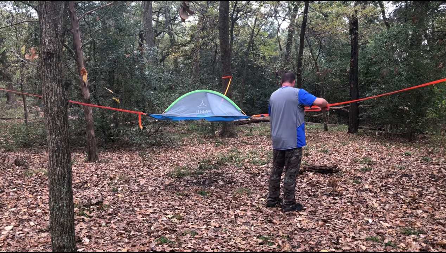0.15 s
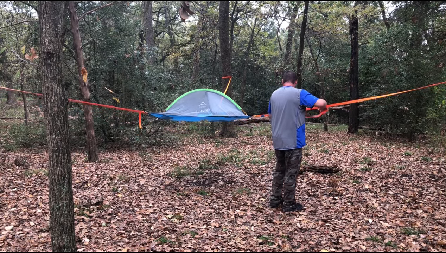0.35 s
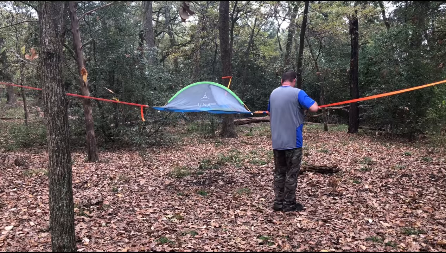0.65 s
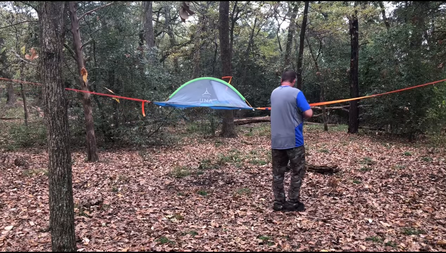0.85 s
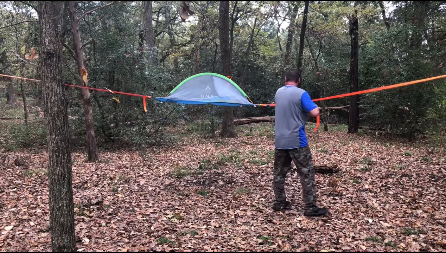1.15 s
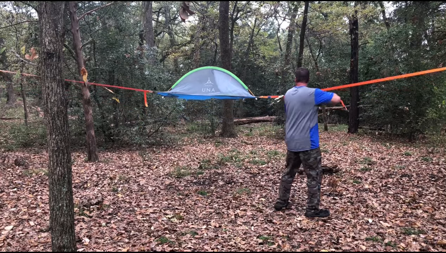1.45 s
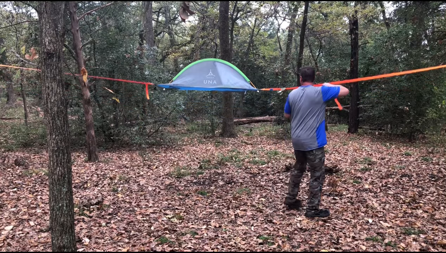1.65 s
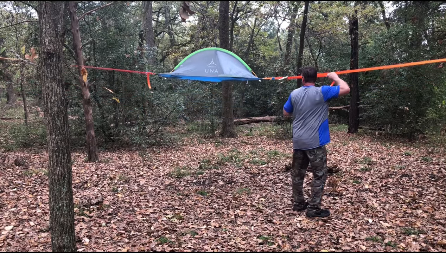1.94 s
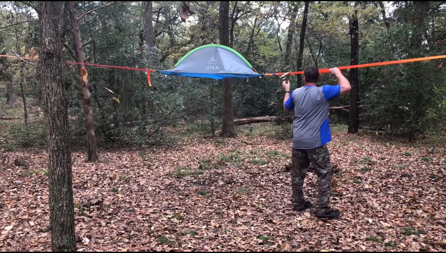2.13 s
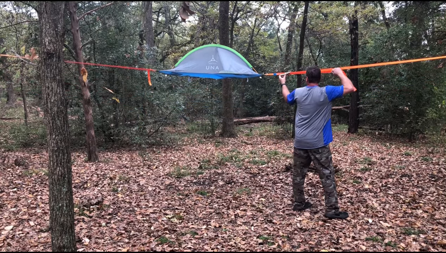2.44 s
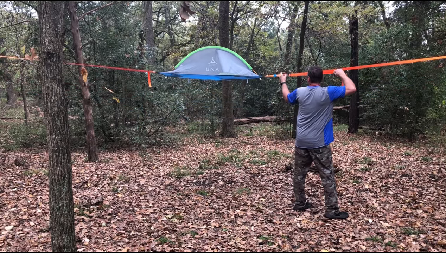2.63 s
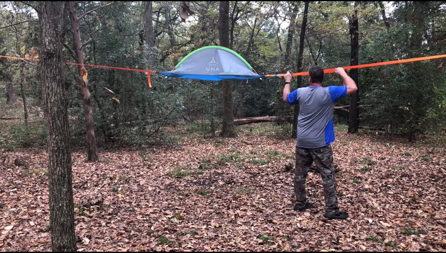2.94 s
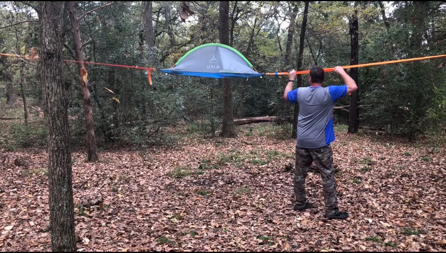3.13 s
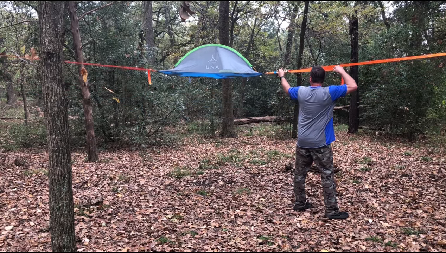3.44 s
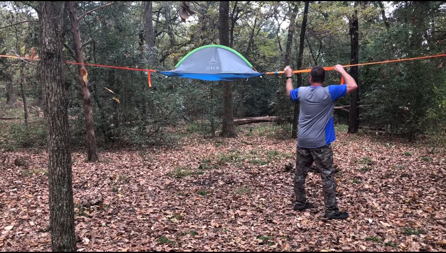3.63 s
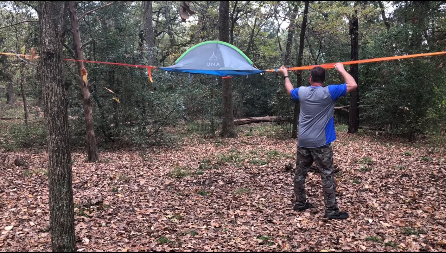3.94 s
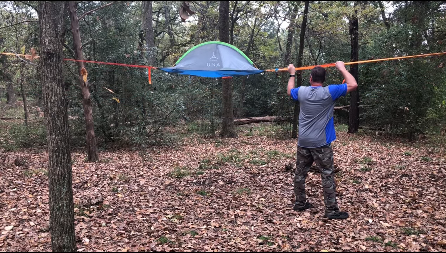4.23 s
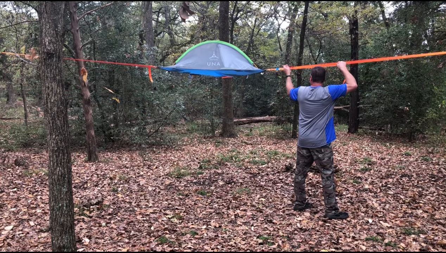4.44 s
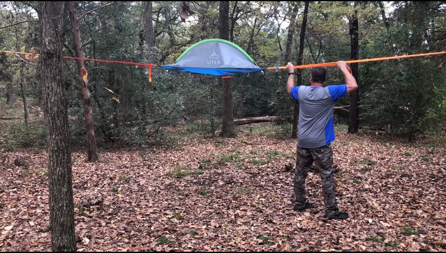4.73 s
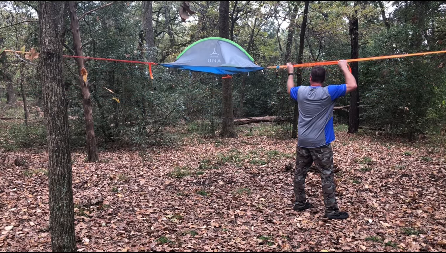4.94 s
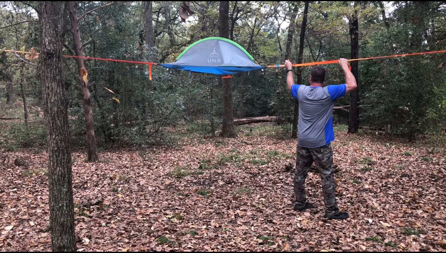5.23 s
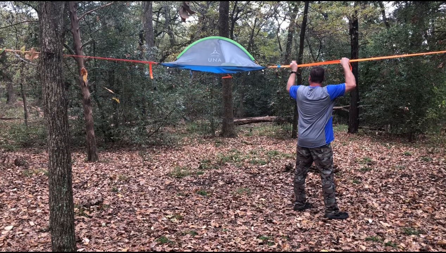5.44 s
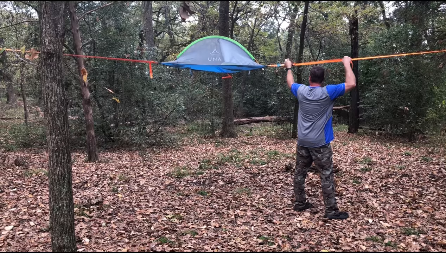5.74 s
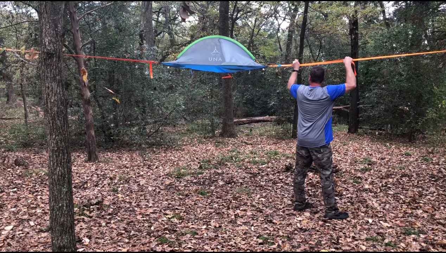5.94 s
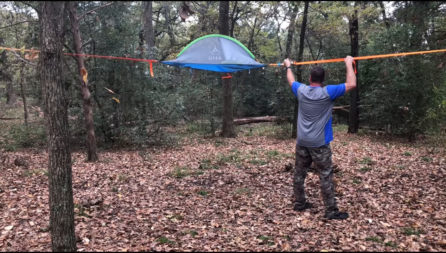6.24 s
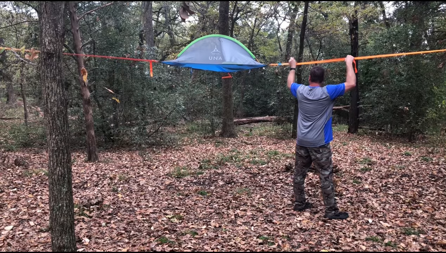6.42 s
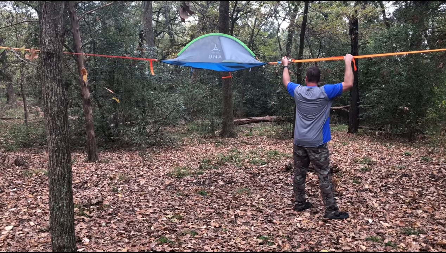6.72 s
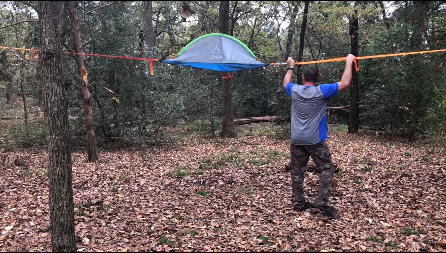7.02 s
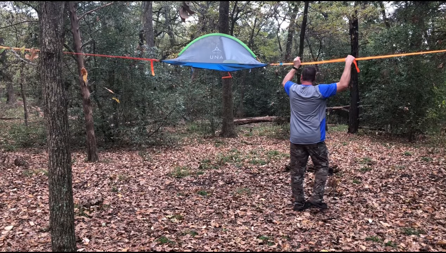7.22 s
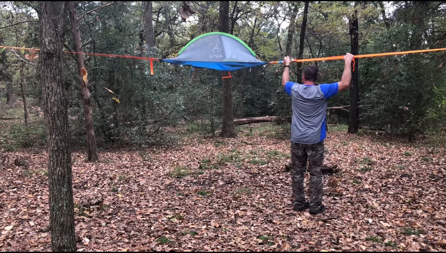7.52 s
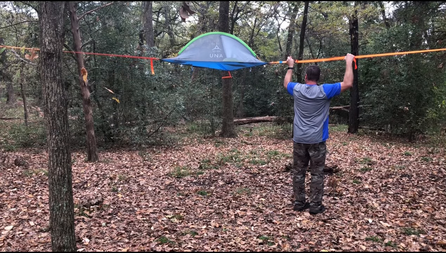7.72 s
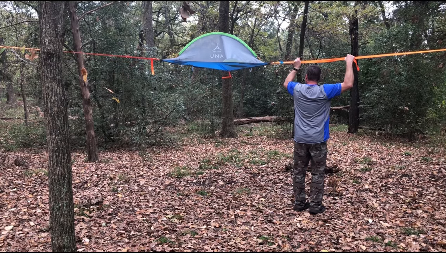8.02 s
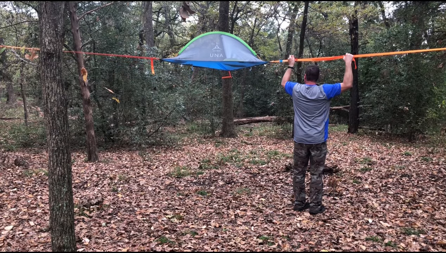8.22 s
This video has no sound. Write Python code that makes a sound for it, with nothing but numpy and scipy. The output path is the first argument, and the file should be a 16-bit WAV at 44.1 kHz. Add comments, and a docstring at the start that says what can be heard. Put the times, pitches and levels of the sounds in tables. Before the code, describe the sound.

A steel ratchet tightens a strap a few metres from the microphone, outdoors among trees. First the slack slides through with a faint rasp, and dry leaves crackle underfoot. After some light clicks from the handle, the cranking begins: bright, crisp double clicks as the handle swings back and forth, each with a short scattered echo from the woods. Soft air and a low, distant rumble lie underneath.

```python
"""A webbing strap is tensioned with a steel ratchet, a few metres away in quiet woods.
Over a distant rumble and a soft hiss of air, the slack is first drawn through with a hiss of friction
while boots crush dry leaves. From 2.4 s come light steel clicks and knocks from the handle and its pawl.
From 3 s it is cranked: on each return the handle pawl snaps over two teeth, on each stroke the loaded
locking pawl does and sets wheel and frame ringing. Brush and trunks scatter every click."""
import sys
import numpy as np
from scipy import signal
from scipy.fft import rfft, irfft
from scipy.io import wavfile
from scipy.ndimage import uniform_filter1d

SR = 44100
rng = np.random.default_rng(int(sys.argv[2]) if len(sys.argv) > 2 else 0)


def unload_audio(sound):
    """Save the sound as a 16-bit wav file, at the path given as the first command line argument."""
    columns = np.transpose(np.atleast_2d(sound))
    # keep every value between -1 and 1, then stretch to whole-number steps
    steps = np.round(np.clip(columns, -1, 1) * 32767)
    wavfile.write(sys.argv[1], SR, steps.astype(np.int16))


N = 369116
TIME = np.arange(N) / SR
AGE = np.arange(SR // 20) / SR   # time since a click, s

# Levels in the tables are relative. Spectral densities of the continuous noises: (f/Hz, level/dB)
RUMBLE_SPECTRUM = [(20, -42), (30, -24), (40, -10.5), (50, -4.5), (61, -9), (72, 3.5), (88, -2),
                   (110, -2.5), (150, -6.5), (200, -11.5), (300, -26)]
AIR_SPECTRUM = [(130, -19.5), (220, 0.5), (350, -0.5), (600, -3), (1000, -4.5), (1600, -9), (2500, -13),
                (4500, -15.5), (7000, -19.5), (10000, -24.5), (15500, -29.5), (16200, -53)]
HISS_SPECTRUM = [(3000, -12), (5000, -5), (7000, -4), (10000, -6), (15500, -4), (16200, -30)]
RASP_SPECTRUM = [(350, -14), (700, 0), (1200, -0.5), (2000, -5.5), (3600, -4), (5000, -7), (7000, -30)]
LEAF_SPECTRUM = [(900, -12), (2000, 0.5), (3500, 0.5), (6000, -4), (10000, -16), (15500, -12)]
# spectral densities of the light ticks, the handle pawl and the locking pawl: (f/Hz, level/dB)
TICK_SPECTRUM = [(1500, -20), (2800, -8), (4000, -3.5), (6000, 0), (9500, 2), (13000, -3), (15700, -5),
                 (16500, -5.5)]
HANDLE_SPECTRUM = [(700, -17), (1800, -10.5), (2700, -6), (3400, -2), (4200, -2), (5100, 0.5), (8000, -2),
                   (9600, 2.5), (10900, -1.5), (13000, 3), (14300, 4.5), (14800, 1), (15700, -3),
                   (16500, -33)]
LOCK_SPECTRUM = [(600, -22), (1150, -24.5), (1500, -10.5), (2050, -15.5), (2300, -9), (3000, -12.5),
                 (3750, -1.5), (4700, -6.5), (6000, 2), (6600, -1), (11000, 5.5), (14300, 5.5),
                 (15700, 4.5), (16500, -15)]
# webbing drawn through the spool: (t/s, duration/s, level/dB)
STRAP_DRAWS = [(0.344, .26, -58.5), (.915, 0.043, -61.5), (0.963, 0.11, -59.5), (1.063, 0.22, -57),
               (1.564, 0.085, -65), (1.677, 0.083, -63), (1.766, 0.1, -54.5), (1.975, 0.25, -64),
               (2.19, .3, -63)]
# a boot shifts in the leaves: (t/s, spread/s, level/dB)
BOOT_SHIFTS = [(.51, 0.056, -60.5), (1.2, 0.084, -60.5), (1.84, .02, -56), (2.41, 0.066, -61)]
# light steel clicks and knocks from the handle and its pawl: (t/s, level/dB, loss on bouncing/dB)
LIGHT_CLICKS = [(2.4084, -36, 19), (2.6373, -24.5, 28), (2.7432, -38, 5), (2.7955, -38, 15),
                (3.64, -28, -1), (3.9948, -26.5, 15), (4.7336, -25.5, 4), (5.273, -24, 2),
                (5.813, -28.5, 10), (6.118, -28, 11), (6.366, -23.5, 0.5), (6.708, -24, 14),
                (6.962, -26, 8), (7.661, -28.5, 5), (7.9529, -23.5, 17), (8.08, -25.5, 3), (8.285, -31, 10)]
# reflections from the leafy ground and near trunks: (delay/s, level/dB)
REFLECTIONS = [(0.0145, -18.5), (.023, -27.5), (.115, -42.5), (.157, -38)]
# handle pawl drops, two to a return: (t/s, chatter duration/s, level/dB, brightness/dB)
HANDLE_DROPS = [(3.0174, 0.0026, -32, 0.8), (3.1766, 0.0026, -30.5, 1), (3.7481, 0.0011, -32, 1),
                (3.8036, 0.001, -31, 0), (4.3144, 0.003, -31, 0.5), (4.369, 0.0029, -33, 2),
                (4.8363, .0023, -32, 2.7), (4.889, 0.0012, -31.5, 0), (5.397, 0.0028, -32.5, 1.3),
                (5.4526, 0.002, -33, 2.2), (5.948, 0.0015, -32.5, 2.5), (6.0048, 0.0039, -33.5, 0.2),
                (6.5134, 0.0031, -32.5, -.4), (6.5807, 0.0034, -34, -1), (7.207, 0.0042, -32.5, .1),
                (7.2721, 0.0042, -34, -3), (7.979, 0.0042, -33.5, -.3), (8.1066, 0.0032, -33.5, 0)]
# locking pawl drops, two to a stroke: (t/s, chatter duration/s, level/dB, brightness/dB, ring level/dB)
LOCK_DROPS = [(3.4378, .0036, -29, -1.8, -28.5), (3.509, 0.0024, -29.5, -0.5, -27.5),
              (4.0545, 0.0039, -25.5, 0.5, -30.5), (4.1383, 0.0046, -26, 0, -32),
              (4.5771, 0.0027, -28, 1.5, -30), (4.6382, 0.0033, -28, 1, -30.5),
              (5.112, 0.0022, -29.5, 1, -25), (5.1794, 0.0042, -28.5, -1, -34),
              (5.6562, 0.0018, -26.5, 3.5, -31), (5.709, 0.0027, -27, -2, -32.5),
              (6.1816, 0.0034, -28.5, 1.5, -30), (6.2271, 0.0035, -29, 1.5, -30),
              (6.773, 0.0043, -27, 0.5, -29.5), (6.8397, .004, -28, 0, -29),
              (7.4873, 0.0028, -27, -2.5, -31), (7.5571, 0.0031, -27, -2.4, -30.5)]
# four bands of a pawl's clash: (lower f/Hz, upper f/Hz)
CLASH_BANDS = [(0, 3000), (3000, 6500), (6500, 11000), (11000, 17000)]
# mean balance of each pawl's clash: (level/dB in each band)
HANDLE_BAND_DB = [-19, -4, -1, 0]
LOCK_BAND_DB = [-16.5, -7, -0.04, 0]
# damped modes of the ratchet wheel: (f/Hz, bandwidth/Hz)
WHEEL_MODES = [(7350, 170), (10100, 200), (11930, 380)]
# their excitation, one row for each tooth of a stroke: (level/dB of each mode)
TOOTH_MODE_DB = [(.5, 0, -0.5), (0.029, -8, 4.5)]
# modes of the steel frame: (f/Hz, level/dB, t60/s)
FRAME_MODES = [(7580, -2, .2), (10200, -13, .22), (10685, -7, .24), (11600, -3, .22), (12010, -11, .17),
               (13140, -10.5, .17)]


def from_db(db):
    """Amplitude ratio of a level in decibels."""
    return 10 ** (np.asarray(db) / 20)


def unit_energy(x):
    """Normalisation: the squares sum to one."""
    return x / np.sqrt(np.sum(x ** 2) + 1e-20)


def noise(spectrum, size, band=(0, SR)):
    """Spectral shaping: Gaussian noise of rms 1, confined to a band."""
    hz = np.maximum(np.fft.rfftfreq(size, 1 / SR), 1)
    point_hz, point_db = np.array(spectrum).T
    gain = from_db(np.interp(np.log(hz), np.log(point_hz), point_db, left=-np.inf, right=-np.inf))
    gain = gain * (hz >= band[0]) * (hz < band[1])
    return unit_energy(irfft(rfft(rng.standard_normal(size)) * gain, size)) * np.sqrt(size)


def flutter(time, step):
    """Random modulation: a new Gaussian value every `step` samples, linearly joined."""
    return np.interp(time, time[::step], rng.standard_normal(len(time[::step])))


def add(track, s, sound):
    """Superposition of a sound on a track, starting at s seconds."""
    start = int(round(s * SR))
    track[start:start + len(sound)] += sound[:len(track) - start]


def background(rumble_db, air_db):
    """Stationary noise: a distant rumble and the hiss of air in the trees."""
    return from_db(rumble_db) * noise(RUMBLE_SPECTRUM, N) + from_db(air_db) * noise(AIR_SPECTRUM, N)


def draw(start_s, length_s, attack_s=0.034, swell_db=5, release_s=.022):
    """Friction noise grows with sliding speed: the envelope of a pull that is fastest halfway through."""
    age = TIME - start_s
    attack = np.clip(age / attack_s, 0, 1)
    swell = from_db(swell_db * (np.sin(np.pi * np.clip(age / length_s, 0, 1)) - 1))
    return attack * swell * np.exp(-np.clip(age - length_s, 0, 1) / release_s)


def webbing(hiss_db, rasp_db, grain_db, firm_pull_db=-58, rasp_exponent=0.93):
    """Stick-slip friction: the weave catches and slips on the spool, giving a finely grained noise."""
    pull = np.max([from_db(db) * draw(s, length_s) for s, length_s, db in STRAP_DRAWS], axis=0)
    rasp_envelope = from_db(firm_pull_db) * (pull / from_db(firm_pull_db)) ** rasp_exponent
    grain = from_db(grain_db * flutter(TIME, step=70))
    hiss = pull * from_db(hiss_db) * noise(HISS_SPECTRUM, N)
    rasp = rasp_envelope * from_db(rasp_db) * noise(RASP_SPECTRUM, N)
    return grain * (hiss + rasp)


def leaves(crackle_db):
    """Brittle fracture: dry leaves crush under the boots in small, uneven cracks."""
    weight = sum(from_db(db) * np.exp(-.5 * ((TIME - s) / spread_s) ** 2)
                 for s, spread_s, db in BOOT_SHIFTS)
    cracks = from_db(crackle_db * np.minimum(flutter(TIME, step=40), 2.5))
    return weight * unit_energy(cracks * noise(LEAF_SPECTRUM, N)) * np.sqrt(N)


def touches(bounce_s=0.019, take_up_s=.0135, take_up_db=-27.5, grip_lead_s=(.015, .1), grip_db=-35.5):
    """Backlash: light clicks, their bounces, the take-up before a return and the grip before a stroke."""
    clicks = [(s, db) for s, db, _ in LIGHT_CLICKS]
    bounces = [(s + bounce_s, db - loss_db) for s, db, loss_db in LIGHT_CLICKS]
    take_ups = [(s - take_up_s, take_up_db) for s, *_ in HANDLE_DROPS[::2]]
    grips = [(s - rng.uniform(*grip_lead_s), grip_db) for s, *_ in LOCK_DROPS[::2] for _ in range(3)]
    return clicks + bounces + take_ups + grips


def chatter(length_s, t60, bounce_db, rise_s=0.00027):
    """Contact bounce: the envelope of an impact holds unevenly for a moment, then decays exponentially."""
    decay_db = -60 * np.maximum(AGE - length_s, 0) / t60
    return np.minimum(AGE / rise_s, 1) * from_db(bounce_db * flutter(AGE, step=24) + decay_db)


def light_ticks(level_db, t60, rebound_db, rebound_s, rebounds=3):
    """Inelastic impact: each light touch of the handle or its pawl is followed by weaker rebounds."""
    out = np.zeros(N)
    for s, db in touches():
        envelope = chatter(0.00066, t60, bounce_db=5.5)
        for delay in rng.uniform(0.0022, rebound_s, rebounds):
            add(envelope, delay, from_db(rebound_db) * chatter(0.00032, t60 / 2, bounce_db=2.0))
        add(out, s, from_db(db + level_db) * woods(envelope * noise(TICK_SPECTRUM, len(AGE))))
    return out


def woods(click, near_db=-17, near_t60=0.15, far_db=-13, far_t60=0.79, treble_t60=0.35,
          echo_t60=0.012, blur_hz=230):
    """Scattering and reflection: echoes and a diffuse tail from brush and trunks follow the click."""
    size = SR // 2
    age = np.arange(size) / SR
    # the steel radiates differently in every direction, so scattering smooths its spectrum
    power = uniform_filter1d(np.abs(rfft(click, size)) ** 2, int(blur_hz * size / SR) + 1)
    near_spectrum, far_spectrum = np.sqrt(np.abs(power)) * rfft(rng.standard_normal((2, size)))
    onset = np.clip((age - .003) / 0.0029, 0, 1)
    near_decay, far_decay, treble_decay = (unit_energy(onset * from_db(-60 * age / t60))
                                           for t60 in (near_t60, far_t60, treble_t60))
    near = near_decay * irfft(near_spectrum, size)
    # air and leaves absorb the treble first
    treble = 1 / (1 + (9000 / np.maximum(np.fft.rfftfreq(size, 1 / SR), 1)) ** 4)
    far = far_decay * irfft(far_spectrum * (1 - treble), size)
    far += treble_decay * irfft(far_spectrum * treble, size)
    out = from_db(near_db) * near + from_db(far_db) * far
    for delay, db in REFLECTIONS:
        rough_face = unit_energy(from_db(-60 * AGE / echo_t60) * rng.standard_normal(len(AGE)))
        add(out, delay, from_db(db) * signal.fftconvolve(click, rough_face))
    add(out, 0, click)
    return out


def scrape(spectrum, length_s):
    """Sliding friction: a pawl rides up the tooth just before it drops."""
    return unit_energy(chatter(length_s, t60=.02, bounce_db=5) * noise(spectrum, len(AGE)))


def clash(envelope, spectrum, level_db, balance_db, brightness_db):
    """Modal overlap: countless short-lived steel modes merge into noise, tilted by the brightness."""
    band_db = level_db + np.array(balance_db) + brightness_db * np.linspace(-1, 1, len(CLASH_BANDS))
    return sum(from_db(db) * unit_energy(envelope * noise(spectrum, len(AGE), band))
               for band, db in zip(CLASH_BANDS, band_db))


def handle_pawl(level_db, scrape_db, scrape_s, t60, bounce_db):
    """Light impact: the unloaded pawl clicks, and more of its sound arrives by scattering."""
    out = np.zeros(N)
    for s, length_s, clash_db, brightness_db in HANDLE_DROPS:
        envelope = chatter(length_s, t60, bounce_db)
        snap = clash(envelope, HANDLE_SPECTRUM, clash_db, HANDLE_BAND_DB, brightness_db)
        add(out, s, woods(snap, near_db=-12.5, far_db=-9))
        add(out, s - scrape_s, from_db(clash_db + scrape_db) * scrape(HANDLE_SPECTRUM, scrape_s))
    return from_db(level_db) * out


def lock_pawl(level_db, wheel_db, frame_db, scrape_db, scrape_s, t60, bounce_db):
    """Impact excitation: the loaded pawl snaps hard and sets wheel and frame ringing."""
    out = np.zeros(N)
    for tooth, (s, length_s, clash_db, brightness_db, ring_db) in enumerate(LOCK_DROPS):
        envelope = chatter(length_s, t60, bounce_db)
        snap = clash(envelope, LOCK_SPECTRUM, clash_db, LOCK_BAND_DB, brightness_db)
        for (hz, width_hz), mode_db in zip(WHEEL_MODES, TOOTH_MODE_DB[tooth % 2]):
            snap += from_db(ring_db + mode_db + wheel_db) * wheel_ring(envelope, hz, width_hz)
        add(out, s, woods(snap))
        add(out, s, from_db(ring_db + frame_db) * frame_ring(spread_db=4))
        add(out, s - scrape_s, from_db(clash_db + scrape_db) * scrape(LOCK_SPECTRUM, scrape_s))
    return from_db(level_db) * out


def wheel_ring(envelope, hz, width_hz):
    """Resonance: the chattering pawl drives one damped mode of the wheel."""
    force = envelope * rng.standard_normal(len(AGE))
    radius = np.exp(-np.pi * width_hz / SR)
    feedback = [1, -2 * radius * np.cos(2 * np.pi * hz / SR), radius * radius]
    return unit_energy(signal.lfilter([1, 0, -1], feedback, force))


def frame_ring(spread_db):
    """Free vibration: the frame's modes decay from a new strength and phase at every snap."""
    age = np.arange(SR // 4) / SR
    hz, mode_db, t60 = np.array(FRAME_MODES).T[:, :, None]
    strength = from_db(mode_db + spread_db * rng.standard_normal(hz.shape) - 60 * age / t60)
    phase = 2 * np.pi * (hz * age + rng.random(hz.shape))
    return unit_energy(np.sum(strength * np.sin(phase), axis=0))


def scene():
    """Superposition of background, strap, boots and ratchet in one channel."""
    ambience = background(rumble_db=-58.0, air_db=-60.5)
    strap = webbing(hiss_db=-1.5, rasp_db=-1.1, grain_db=2.6)
    boots = leaves(crackle_db=6.5)
    rattle = light_ticks(level_db=-14, t60=.011, rebound_db=-9, rebound_s=0.016)
    returns = handle_pawl(level_db=26.0, scrape_db=-9.0, scrape_s=.0035, t60=0.021, bounce_db=5.0)
    strokes = lock_pawl(level_db=26.0, wheel_db=-0.5, frame_db=-25, scrape_db=-21, scrape_s=0.0009,
                        t60=.022, bounce_db=2.5)
    return (ambience + strap + boots + rattle + returns + strokes)[None]


def record(dry):
    """Band limiting: a steep elliptic low-pass at 16 kHz."""
    return signal.sosfilt(signal.ellip(10, .2, 80, 16000, fs=SR, output="sos"), dry)


dry = scene()
out = record(dry)
unload_audio(out)
```